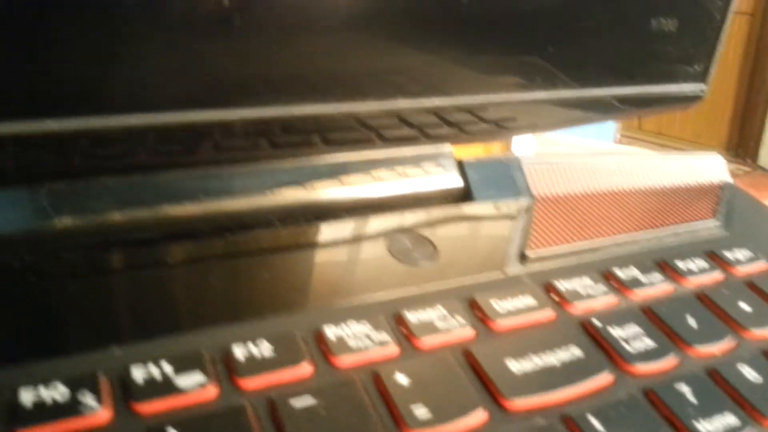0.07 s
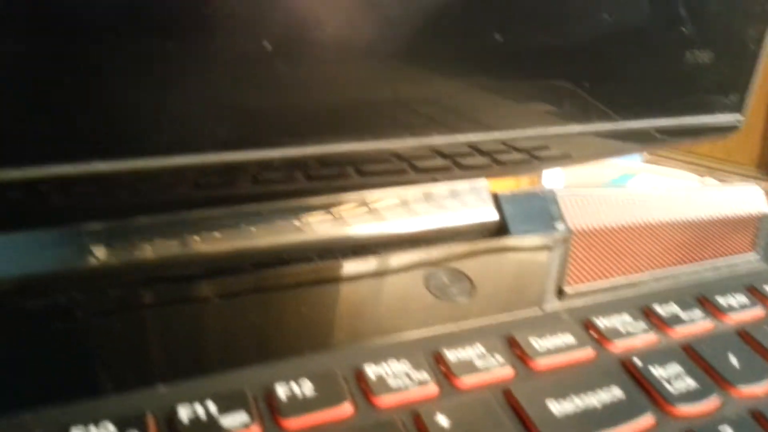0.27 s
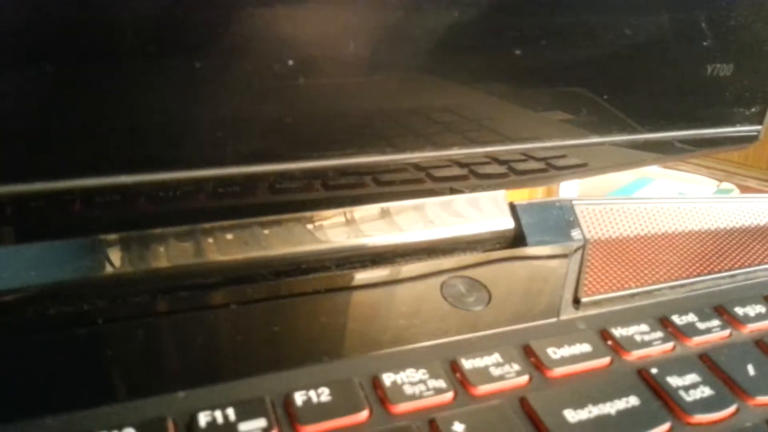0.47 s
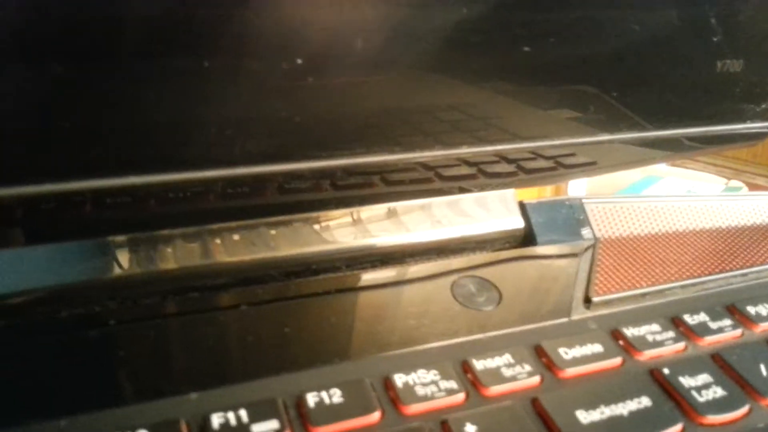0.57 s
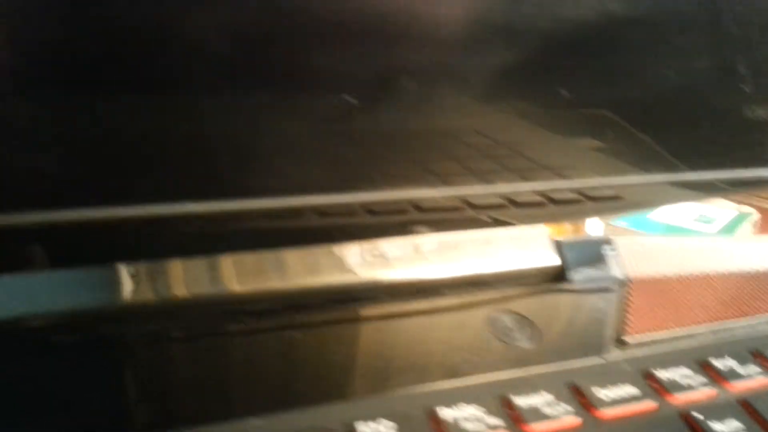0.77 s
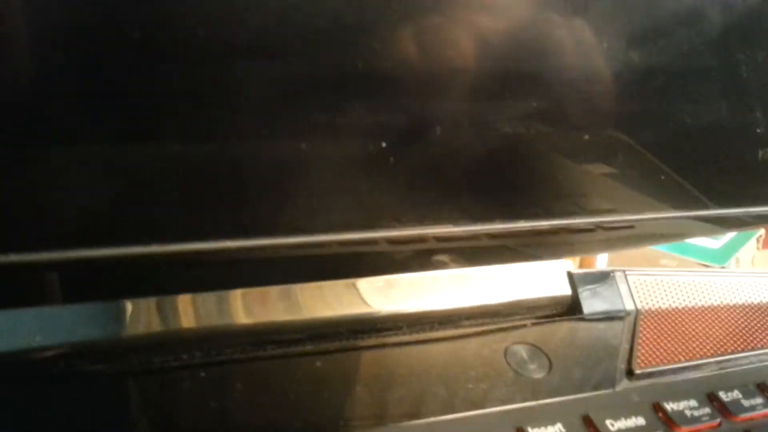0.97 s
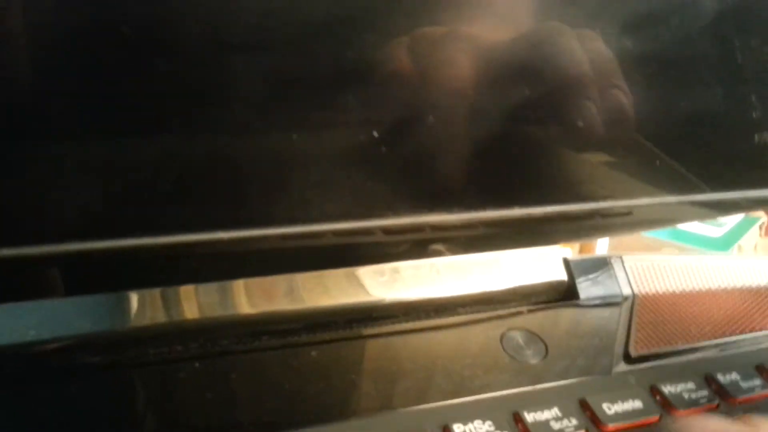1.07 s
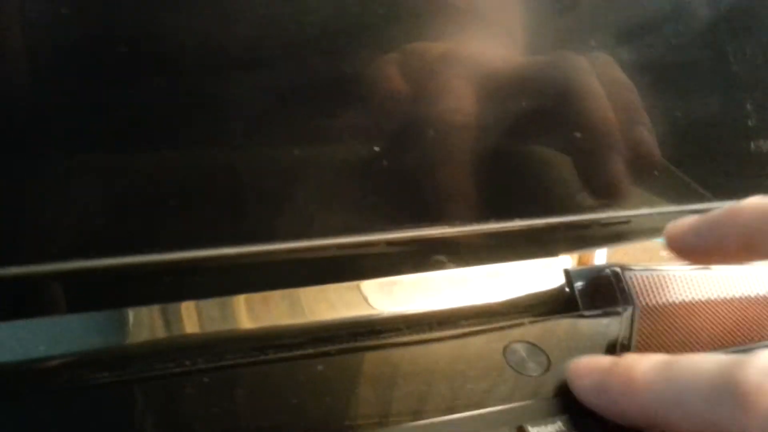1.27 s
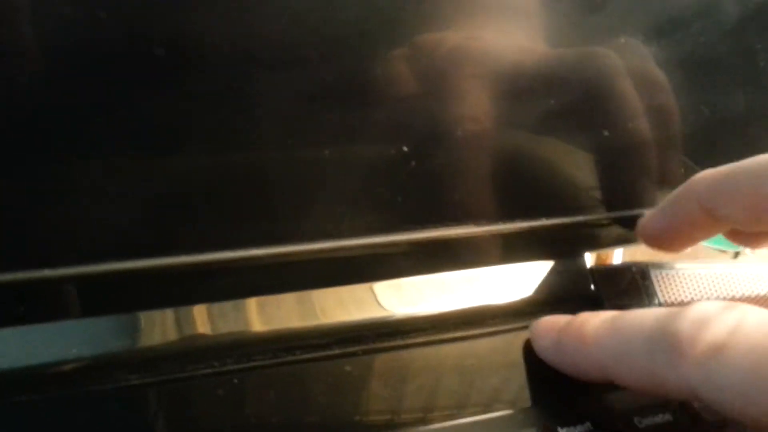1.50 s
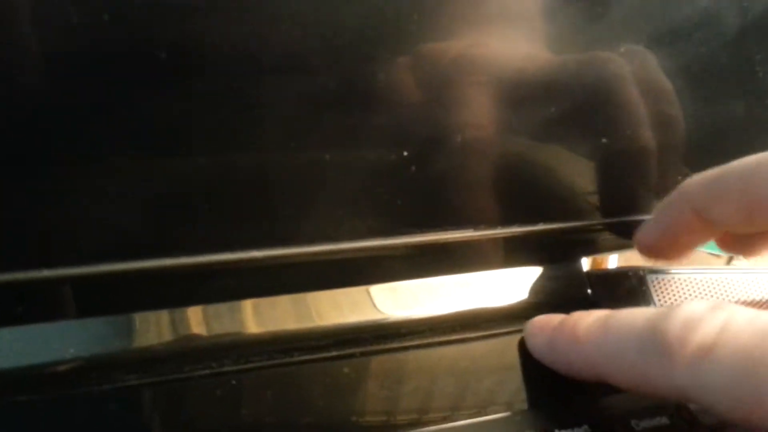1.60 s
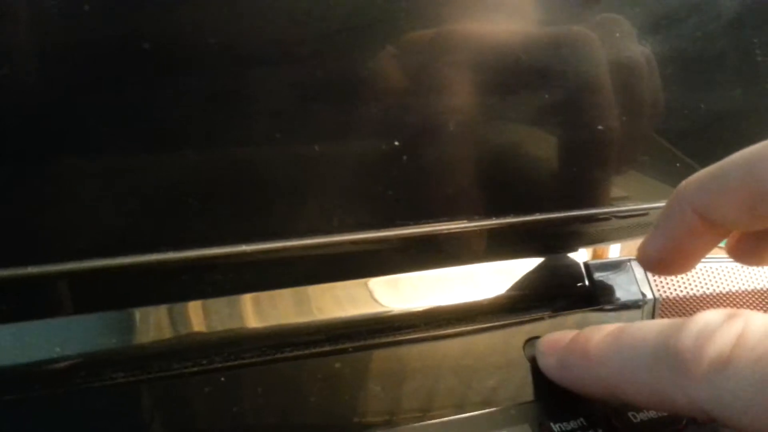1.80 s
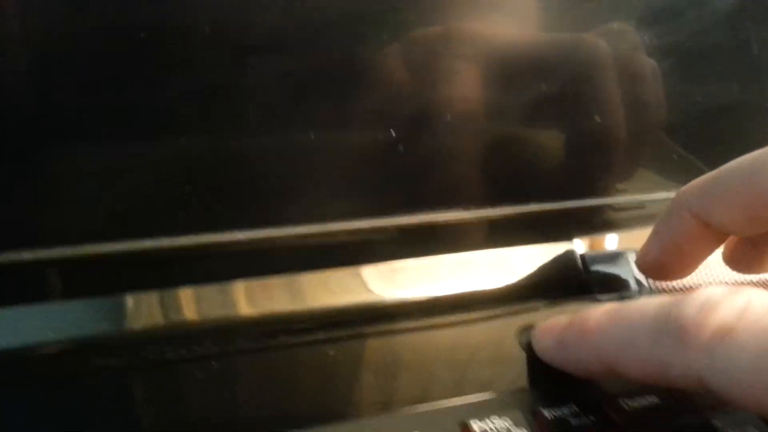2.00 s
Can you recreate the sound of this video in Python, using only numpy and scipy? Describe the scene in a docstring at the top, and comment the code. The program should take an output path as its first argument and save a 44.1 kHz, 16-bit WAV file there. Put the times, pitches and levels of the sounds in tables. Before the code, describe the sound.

A laptop knocks sharply on a desk at about 0.25 seconds, hollow with a slight plastic rattle. Its feet drag briefly, the shell snaps, and a second knock lands at 0.5 seconds. Faint finger brushes and dull bumps follow, with two tiny nail ticks near 1.2 seconds and a soft fingertip tap around 1.55. Low room hiss continues until the end at about 2 seconds.

```python
"""Laptop shifted on a desk

It knocks down, rocks, and knocks again on another corner. Case and desk ring with low hollow
modes, the plastic cracks and rattles, and a small room answers. Between the knocks the feet drag
and the shell snaps under load. Then fingers brush, bump, tick and tap on the case over a faint hiss."""
import sys
import numpy as np
from scipy import signal
from scipy.fft import rfft, irfft, next_fast_len
from scipy.io import wavfile

SR = 44100
rng = np.random.default_rng(int(sys.argv[2]) if len(sys.argv) > 2 else 0)


def log_audio(samples):
    """Write samples as a 16-bit WAV file to the path given in sys.argv[1]."""
    # one column per channel
    frames = np.atleast_2d(samples).T
    # limit to full scale, then quantise
    limited = np.clip(frames, -1, 1)
    pcm = np.round(limited * 32767).astype(np.int16)
    wavfile.write(sys.argv[1], SR, pcm)


N = 90404

# stereo image of hiss and friction: freq_hz, left_right_correlation
NOISE_CORRELATION = [(60, .7), (130, .9), (290, 0.62), (640, 0.18), (1410, 0.057), (15000, .05)]
CASE_PAN_DB = -3
RING_ATTACK_S = 0.0014


def amp(db):
    """Decibels to gain."""
    return 10 ** (np.asarray(db) / 20)


def unit(x):
    """Scale to rms 1."""
    return x / np.sqrt(np.mean(x ** 2) + 1e-20)


def along(points, hz):
    """Interpolate (freq_hz, value) points on a log axis."""
    freqs_hz, values = np.transpose(points)
    return np.interp(np.log(hz + 1), np.log(freqs_hz + 1), values)


def pan(db):
    """Stereo gains for a left-minus-right level."""
    return amp(np.array([[db], [-db]]) / 2)


def since(start_s):
    """Seconds since the start, zero before."""
    return np.maximum(np.arange(N) / SR - start_s, 0)


def filtered(x, response):
    """Apply a frequency response."""
    size = next_fast_len(N + SR // 2)
    return irfft(rfft(x, size) * response(np.fft.rfftfreq(size, 1 / SR)), size)[..., :N]


def minimum_phase(gain):
    """Response with this gain that starts at once and rings afterwards."""
    cepstrum = irfft(np.log(np.maximum(gain, 1e-6)))
    half = len(cepstrum) // 2
    fold = np.r_[1, np.full(half - 1, 2), 1, np.zeros(half - 1)]
    return np.exp(rfft(cepstrum * fold))


def noise(colour_db, correlation=NOISE_CORRELATION):
    """Coloured stereo noise of rms 1."""
    def mid_side_gains(hz):
        angle = np.arccos(np.clip(along(correlation, hz), -1, 1)) / 2
        return amp(colour_db(hz)) * [np.cos(angle), np.sin(angle)]
    mid, side = filtered(rng.standard_normal((2, N)), mid_side_gains)
    return unit(np.array([mid + side, mid - side]))


def band(centre_hz, width_oct):
    """Bell-shaped colour in dB."""
    return lambda hz: -10 * np.log10(np.e) * (np.log2((hz + 1) / centre_hz) / width_oct) ** 2


def struck(start_s, attack_s, t60_s):
    """Quick rise, exponential decay."""
    t = since(start_s)
    return (1 - np.exp(-t / attack_s)) * amp(-60 * t / t60_s)


def burst(start_s, colour, attack_s, t60_s):
    """Many close modes struck together: dying noise rung through a colour."""
    # stereo image of impacts: freq_hz, left_right_correlation
    correlation = [(150, 0.91), (400, 0.92), (900, -0.11), (2000, 0.11), (5000, -0.26), (10000, 0)]
    push = struck(start_s, attack_s, t60_s) * noise(np.zeros_like, correlation)
    return filtered(push, lambda hz: minimum_phase(unit(amp(along(colour, hz)))))


def background():
    """Room tone, a faint hum, and a hiss that swells while the laptop moves."""
    # room tone spectrum: freq_hz, gain_db
    tone_colour = [(18, -68.5), (30, -35), (139, -10.5), (195, -6), (234, -13), (274, -10), (426, -10),
                   (597, -8), (905, -19), (1000, -18), (1440, -16), (3320, -24.5), (4900, -22.5),
                   (13900, -26), (15000, -38)]
    # hiss envelope: time_s, level_db
    hiss_levels = [(0, -64.5), (0.161, -69), (.235, -59.5), (.26, -55), (.45, -53.5), (.62, -56),
                   (.66, -63), (.75, -64), (.8, -59), (0.919, -63.5), (1.0, -65.5), (1.3, -62.5),
                   (1.8, -66.5), (1.87, -75)]
    # hiss spectrum: freq_hz, gain_db
    hiss_colour = [(200, -10.5), (1000, 1), (2500, -3), (4500, -1), (7500, -6.5), (11000, -10),
                   (14500, -8.5)]
    tone = amp(-62.5) * noise(lambda hz: along(tone_colour, hz))
    hum = amp(-73) * noise(band(centre_hz=200.7, width_oct=0.084))
    swell = amp(np.interp(np.arange(N) / SR, *np.transpose(hiss_levels)))
    hiss = swell * noise(lambda hz: along(hiss_colour, hz))
    return pan(-2) * (tone + hum + hiss)


def body_ring(start_s, corner, cutoff_hz):
    """Case and desk modes: the corner sets their mix; a soft contact barely rings the high ones."""
    # modes: freq_hz, first_corner_db, second_corner_db, t60_s, left_minus_right_db
    modes = [(148.2, -44, -29.5, 0.26, -2), (207, -34.5, -26, 0.21, -0.5), (271.5, -54, -13.5, 0.22, -2.5),
             (285.8, -16, -26, 0.14, -2.5), (310.5, -23, -36, .11, -2), (359.3, -28, -16.5, 0.085, -4.5),
             (403, -40, -12, 0.14, -6), (424.7, -25, -35, 0.18, -8.5), (458, -20, -20.5, .19, -0.5),
             (535, -31, -32, 0.19, -1.5), (620.8, -24, -19.5, .19, -2.5), (649, -70, -16.5, 0.094, -4),
             (667, -29.5, -56.5, 0.05, 11), (750, -34.5, -31, 0.073, -4), (833.4, -27, -14, .11, -0.5),
             (858, -21.5, -20, 0.12, 9.5), (939, -37.5, -24.5, 0.18, -4), (979, -32, -39, 0.14, -5.5),
             (1085, -32, -40, 0.17, -4.5), (1169, -30, -31.5, 0.11, 7.5), (1267, -39, -35, 0.2, -14.5),
             (1379, -20.5, -40, .07, 1), (1673, -41, -32, .11, -7), (1810, -34.5, -41, .11, -7),
             (1990, -26.5, -47, 0.058, -7.5), (1933, -29, -36.5, .11, -9)]
    ring = np.zeros((2, N))
    arrival_s = np.array([[start_s + 0.00025], [start_s]])  # right side first
    for k, (hz, first_db, second_db, t60_s, pan_db) in enumerate(modes):
        gain = amp(first_db + corner * (second_db - first_db)) / np.hypot(1, (hz / cutoff_hz) ** 2)
        polarity = (-1) ** (k // 2)  # neighbouring pairs swing oppositely
        mode = struck(arrival_s, RING_ATTACK_S, t60_s) * np.sin(2 * np.pi * hz * since(arrival_s))
        ring += polarity * gain * pan(pan_db) * mode
    return ring


def knocks():
    """Each desk contact rings the body, cracks and rattles the plastic, and excites the room."""
    # contacts: start_s, ring_gain_db, plastic_gain_db, corner (0 first, 1 second), cutoff_hz
    contacts = [(0.2456, 4, -4.5, 0.1, 4000), (0.4137, -20.5, -28.5, 0, 1500), (.482, -14, -17.5, 1, 330),
                (.507, -3.5, -4.5, 0.96, 3000)]
    # contact crack spectrum: freq_hz, gain_db
    crack_colour = [(30, -28), (100, -17.5), (300, 9), (800, 10), (1400, 3.5), (2000, -1.5), (2700, -7),
                    (4500, -0.5), (6500, -5.5), (9000, -16), (15000, -25.5)]
    # damped shell ring spectrum: freq_hz, first_corner_db, second_corner_db
    shell_colours = [(200, -31, -22.5), (800, -8, -5.5), (1180, -0.5, 4.5), (1400, 1, -2.5),
                     (1600, -5, -4.5), (1820, -4, 5), (1957, 6.5, -16), (2600, -16.5, -21),
                     (5026, -18.5, -15), (9000, -34, -19), (15000, -39, -39)]
    # dense upper modes: freq_hz, gain_db
    rattle_colour = [(100, -51), (250, -4.5), (600, 2.5), (1200, -3), (2000, -14.5), (2800, -19),
                     (5500, -17), (8000, -33.5), (15000, -46.5)]
    # reverberation spectrum: freq_hz, gain_db
    room_colour = [(80, -35), (200, -3), (500, 1.5), (900, -7), (2000, -29.5), (6000, -35), (15000, -67.5)]
    ring, strike = np.zeros((2, N)), np.zeros((2, N))
    for start_s, ring_gain_db, plastic_gain_db, corner, cutoff_hz in contacts:
        ring += amp(ring_gain_db) * body_ring(start_s, corner, cutoff_hz)
        crack = amp(-7.5) * burst(start_s, crack_colour, attack_s=0.0011, t60_s=0.015)
        shell_colour = [(hz, first + corner * (second - first)) for hz, first, second in shell_colours]
        clack = amp(-23) * burst(start_s, shell_colour, attack_s=0.0011, t60_s=0.084)
        rattle = amp(-21) * burst(start_s, rattle_colour, RING_ATTACK_S, t60_s=0.18)
        room = amp(-28) * burst(start_s, room_colour, attack_s=0.012, t60_s=0.33)
        strike += amp(plastic_gain_db) * (crack + clack + rattle) + amp(ring_gain_db) * room
    low_cut = signal.butter(3, 119, "high", fs=SR, output="sos")
    return signal.sosfilt(low_cut, ring) + pan(CASE_PAN_DB) * strike


def friction():
    """Dragging feet, brushing skin and hand bumps: noise bands that swell and fade."""
    # feet on the desk: peak_s, rise_s, fall_s, level_db, centre_hz, width_oct
    drags = [(0.459, 0.028, 0.029, -39.5, 558, 0.32)]
    # skin on the case: same columns
    brushes = [(0.611, .03, 0.025, -58, 4200, 1), (.85, .08, 0.085, -61.5, 5170, .7),
               (1.217, 0.036, 0.041, -56, 5300, 0.87), (1.236, 0.038, 0.024, -59.5, 3390, 0.093),
               (1.45, 0.038, 0.042, -66.5, 4350, 0.43), (1.59, 0.021, 0.019, -64, 2110, 1),
               (1.73, .04, .05, -65.5, 3900, 0.43), (1.8, 0.051, 0.022, -59, 1340, 0.67)]
    # dull hand bumps: same columns
    bumps = [(.778, .022, .03, -55, 165, .35), (.87, .04, .07, -63, 140, .3), (.85, .06, .06, -66, 500, .5),
             (1.297, .02, .013, -63, 470, .2), (1.39, .04, .05, -68, 135, .3)]
    out, t = np.zeros((2, N)), np.arange(N) / SR
    for peak_s, rise_s, fall_s, level_db, centre_hz, width_oct in drags + brushes + bumps:
        width_s = np.where(t < peak_s, rise_s, fall_s)
        swell = np.exp(-0.5 * ((t - peak_s) / width_s) ** 2)
        out += amp(level_db) * swell * noise(band(centre_hz, width_oct))
    return pan(CASE_PAN_DB) * out


def shell_snaps():
    """The plastic snaps as it takes the load, just before the second loud knock."""
    # snaps: start_s, level_db
    snaps = [(0.4777, -29.5), (0.48, -41.5), (0.4875, -36)]
    # snap spectrum: freq_hz, gain_db
    colour = [(200, -16), (1000, -3), (1600, 5.5), (2800, -1.5), (4500, -1.5), (6500, -8.5), (9000, -13),
              (15000, -23.5)]
    out = np.zeros((2, N))
    for start_s, level_db in snaps:
        out += amp(level_db) * burst(start_s, colour, attack_s=0.00022, t60_s=0.026)
    return pan(CASE_PAN_DB) * out


def nail_ticks():
    """A fingernail briefly rings bright modes."""
    # ticks: start_s, gain_db, low_cut_hz
    ticks = [(1.1599, -38.5, 3040), (1.2051, -35.5, 7500)]
    # tick modes: freq_hz, gain_db
    modes = [(4330, 4), (4520, 0), (6200, -0.5), (7180, 0.5), (8020, -6), (8900, -1), (11800, -8)]
    out = np.zeros((2, N))
    for start_s, gain_db, low_cut_hz in ticks:
        t = since(start_s)
        ping = sum(amp(db) * np.sin(2 * np.pi * (hz * t + rng.random((2, 1)))) for hz, db in modes)
        envelope = struck(start_s, attack_s=0.00018, t60_s=0.0082)
        low_cut = signal.butter(4, low_cut_hz, "high", fs=SR, output="sos")
        out += amp(gain_db) * signal.sosfilt(low_cut, ping * envelope)
    return pan(CASE_PAN_DB) * out


def fingertip_taps():
    """Fingertips strike the case: dull taps with a faint tail."""
    # taps: start_s, level_db
    taps = [(1.44, -53), (1.5545, -40.5)]
    # tap spectrum: freq_hz, gain_db
    colour = [(60, -33), (150, -11), (450, -2), (750, -19.5), (1050, 2.5), (1550, -2.5), (2200, -28),
              (3500, -19), (6000, -35), (15000, -31)]
    out = np.zeros((2, N))
    for start_s, level_db in taps:
        tap = burst(start_s, colour, attack_s=0.00026, t60_s=0.035)
        tail = amp(-15) * burst(start_s, colour, RING_ATTACK_S, t60_s=0.28)
        out += amp(level_db) * (tap + tail)
    return pan(CASE_PAN_DB) * out


def scene():
    """Knocks and small handling sounds over room tone."""
    return knocks() + shell_snaps() + nail_ticks() + fingertip_taps() + friction() + background()


def record(dry):
    """Steep 22 dB treble shelf, then a hard band limit."""
    shelf_hz, hz_per_db, limit_hz = 14700, 15, 15886
    return filtered(dry, lambda hz: amp(-np.clip((hz - shelf_hz) / hz_per_db, 0, 22)) * (hz < limit_hz))


dry = scene()
out = record(dry)
log_audio(out)
```